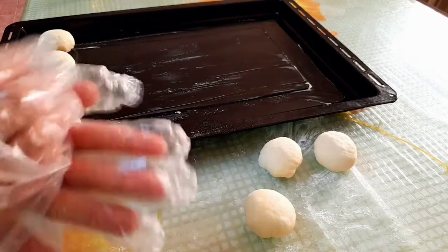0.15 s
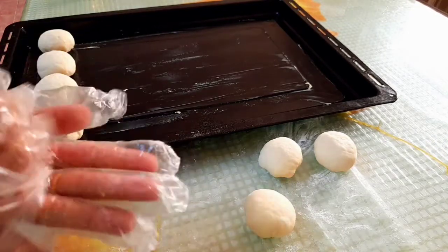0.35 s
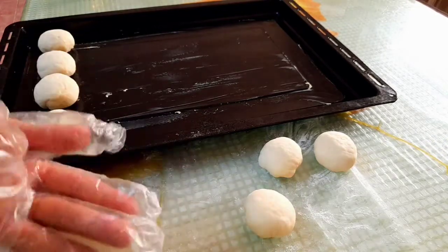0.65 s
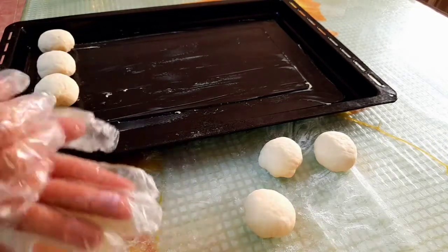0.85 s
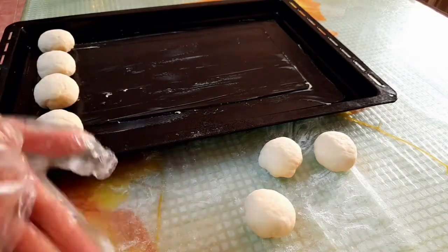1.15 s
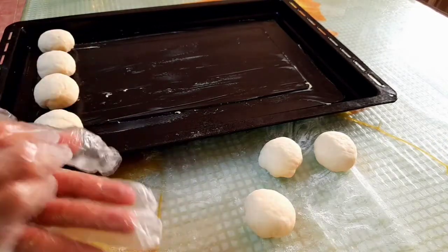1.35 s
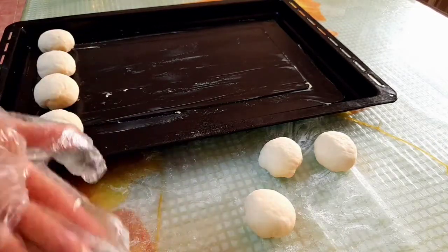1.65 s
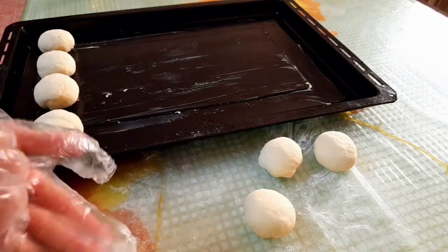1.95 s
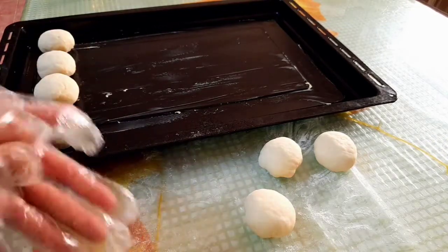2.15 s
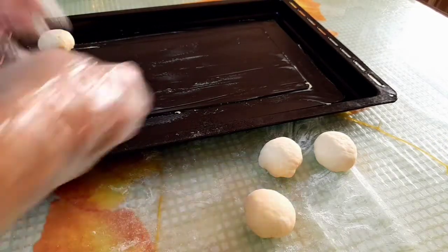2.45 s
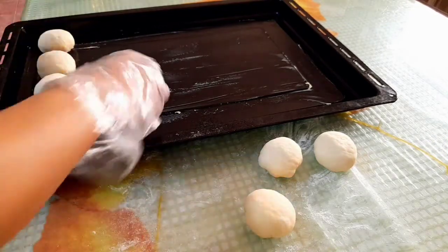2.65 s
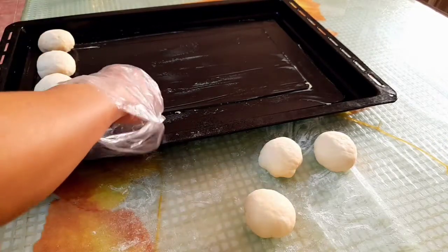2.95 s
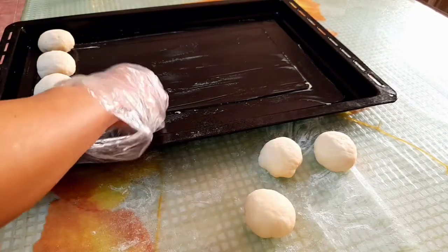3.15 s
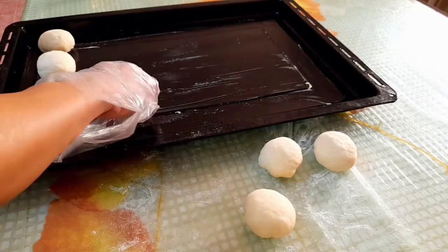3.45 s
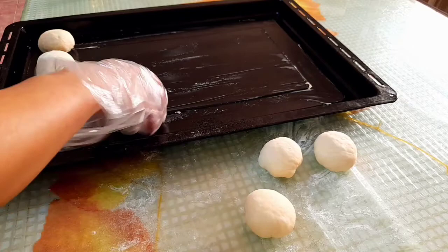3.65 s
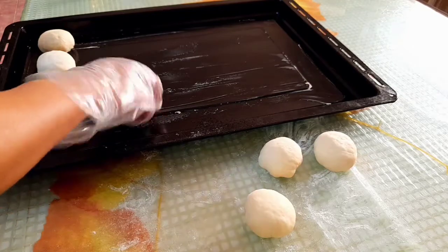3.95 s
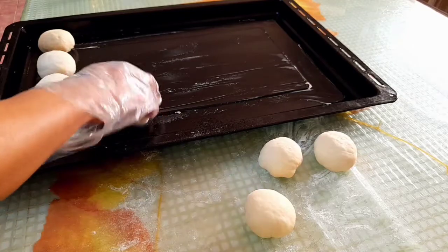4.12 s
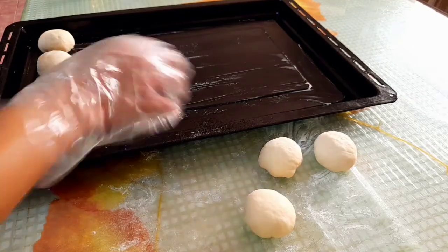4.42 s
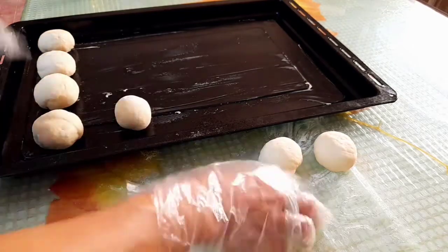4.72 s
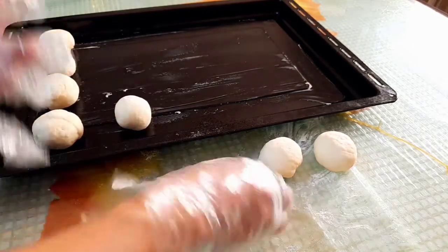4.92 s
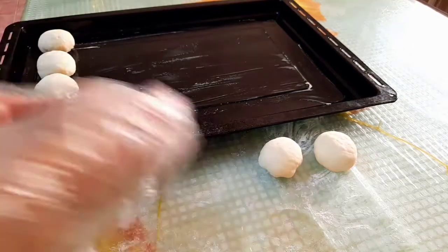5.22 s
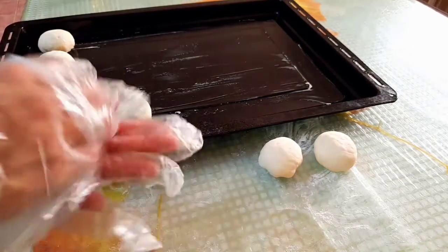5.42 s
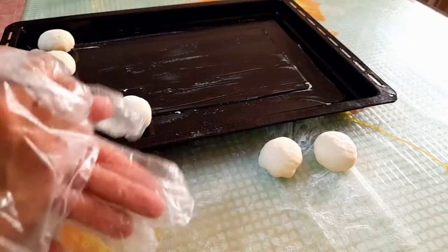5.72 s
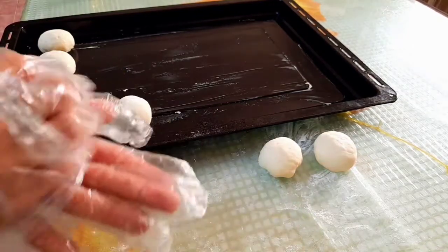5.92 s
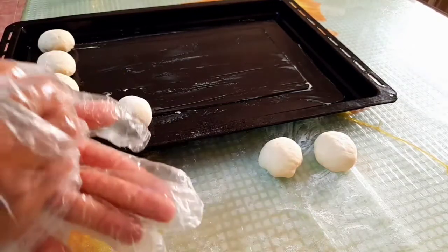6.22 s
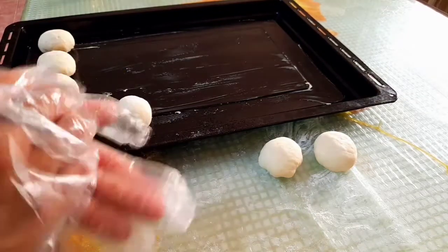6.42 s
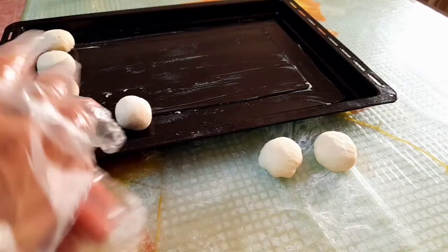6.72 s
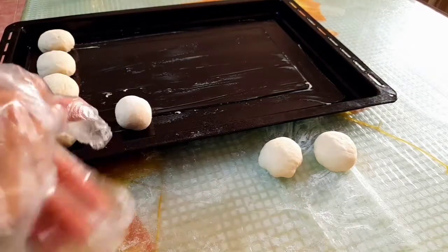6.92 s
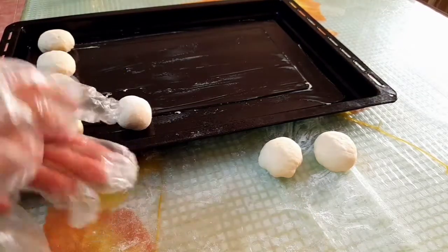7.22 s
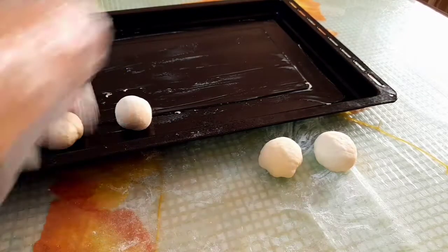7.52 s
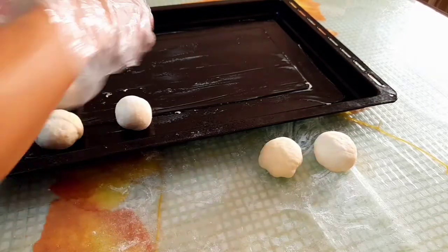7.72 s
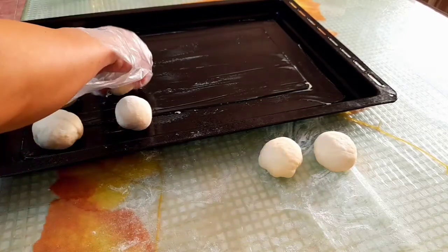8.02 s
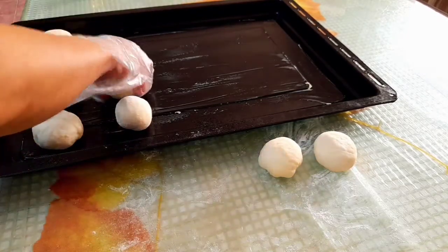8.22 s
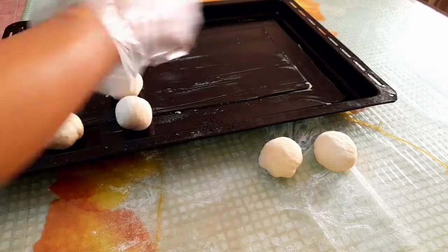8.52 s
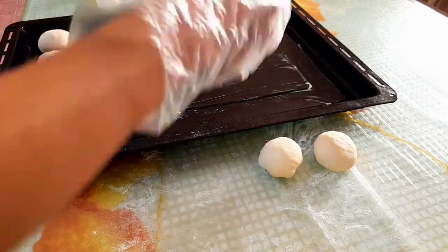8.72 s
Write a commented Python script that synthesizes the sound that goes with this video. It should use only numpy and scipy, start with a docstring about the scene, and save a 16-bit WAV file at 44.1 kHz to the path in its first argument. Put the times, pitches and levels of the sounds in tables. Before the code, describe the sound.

Close, bright crinkling of loose plastic film on moving hands, dense then sparse then dense again, above a constant deep hum in a small room.

```python
"""A kitchen: hands in loose, thin plastic gloves roll dough balls close to a stereo microphone.
The film rustles in swarms of tiny ringing snaps that swell and fade with each movement of the hands,
with sharper pops of filtered noise on top and short diffuse reflections around them.
Behind lie the hum of a compressor and the mains (sine harmonics), wavering fan tones,
and the air noise of the room (shaped noise)."""
import sys
import numpy as np
from scipy import signal
from scipy.fft import rfft, irfft, next_fast_len
from scipy.io import wavfile
from scipy.ndimage import uniform_filter1d

SR = 44100
rng = np.random.default_rng(int(sys.argv[2]) if len(sys.argv) > 2 else 0)


def wav_record(signal):
    """Record a signal, one row per channel, as 16-bit PCM in the file named by sys.argv[1]."""
    frames = np.transpose(np.atleast_2d(signal))
    bounded = np.clip(frames, -1, 1)
    # unit amplitude maps onto the largest positive 16-bit level
    quanta = np.round(bounded * 32767).astype(np.int16)
    wavfile.write(sys.argv[1], SR, quanta)


N = 391166   # length in samples


def amp(db):
    """dB to gain."""
    return 10 ** (np.asarray(db) / 20)


def rms_one(x):
    """Scale to unit rms."""
    return x / np.sqrt(np.mean(x ** 2) + 1e-20)


def at_hz(points, hz):
    """Read a curve of (f/Hz, value) on a log-frequency axis."""
    p = np.array(points)
    return np.interp(np.log(np.maximum(hz, 1)), np.log(np.maximum(p[:, 0], 1)), p[:, 1])


def sides(pan_db):
    """Left and right gains for a left-right level difference in dB."""
    return amp(np.multiply.outer([.5, -.5], pan_db))


def drift(rate_hz):
    """Slow random wander with rms 1: noise through two equal low-pass poles, run every 40 samples."""
    step, settle = 40, 4000
    pole = np.exp(-2 * np.pi * rate_hz * step / SR)
    noise = rng.standard_normal(N // step + settle + 2)
    slow = signal.lfilter([1], [1, -2 * pole, pole * pole], noise)[settle:]
    return np.interp(np.arange(N) / step, np.arange(len(slow)), rms_one(slow))


def colour(x, gain):
    """Multiply the spectrum by gain(Hz)."""
    size = next_fast_len(N + 4096)
    hz = np.arange(size // 2 + 1) * SR / size
    return irfft(rfft(x, size) * gain(hz), size)[..., :N]


COMPRESSOR_HZ, MAINS_HZ = 66.917, 59.98
# Harmonics of the compressor: (multiple of its f, rms level/dB, left-right level/dB)
COMPRESSOR_HARMONICS = [(1, -30, -4.0), (2, -63, -3.5), (3, -51, -1.5), (4, -60, -5.0), (5, -57, .8),
                        (6, -62, -2.0), (7, -68, 3.0), (8, -70, -9.0), (9, -71, .7), (11, -70, 7.0)]
# Harmonics of the mains: (multiple of its f, rms level/dB, left-right level/dB)
MAINS_HARMONICS = [(2, -56, -1.5), (4, -63, -10), (8, -72, -10), (10, -74.5, 5)]


def compressor_and_mains():
    """Two harmonic rows of sines at fixed pitch, their level breathing slightly together."""
    t, out = np.arange(N) / SR, np.zeros((2, N))
    load = amp(.35 * drift(.7))
    lead = np.array([[.1], [-.1]])   # radians: the left port is reached a little earlier
    for base_hz, rows in ((COMPRESSOR_HZ, COMPRESSOR_HARMONICS), (MAINS_HZ, MAINS_HARMONICS)):
        for multiple, level_db, pan_db in rows:
            phase = 2 * np.pi * (multiple * base_hz * t + rng.random())
            gain = np.sqrt(2) * amp(level_db) * sides(pan_db)[:, None]
            out += gain * load * np.sin(phase + lead)
    return out


# Tones of fans and motors: (mean f/Hz, typical rms level/dB, left-right level/dB, rms waver of f/Hz)
FAN_TONES = [(57.3, -53, -3.1, .3), (59.2, -57, -4.9, .2), (109.9, -43.5, -1.7, .35),
             (115.2, -55, -2.2, .4), (116.3, -51, -3.1, .4), (219.6, -59, -1.9, .7), (249.0, -58, -2.9, .7),
             (329.7, -59, -3.5, 1.0)]


def fans():
    """Single motor tones: the speed wavers, so each pitch wanders, and the level drifts as well."""
    out = np.zeros((2, N))
    for hz, level_db, pan_db, waver_hz in FAN_TONES:
        cycles = np.cumsum(hz + waver_hz * drift(0.411)) / SR
        phase = 2 * np.pi * (cycles + rng.random())
        level = np.sqrt(2) * amp(level_db + 1.07 * drift(2.3))
        out += level * sides(pan_db)[:, None] * np.sin(phase)
    return out


AIR_DB = -40   # rms level of the air noise
# Broad spectrum of the air noise: (f/Hz, relative level/dB per Hz)
AIR_SPECTRUM = [(20, -12), (45, -8), (80, -1.5), (130, -5), (190, -8.5), (350, -7.5), (510, -15),
                (750, -8.5), (1200, -12), (1700, -17), (2500, -16), (3300, -23), (7300, -27), (8500, -35),
                (12500, -27), (15000, -32)]
# Low resonances of the room: (f/Hz, width/Hz, lift/dB)
ROOM_RESONANCES = [(142.3, 7.6, 5.5), (164.2, 8.4, 12), (217, 8, 0), (245, 6, 3), (305, 21, 6),
                   (373, 13.5, 7), (414.3, 7.8, 7.5), (468, 10, 10.5), (554, 16, 7.5)]
# Stereo width of the air noise: (f/Hz, left-right correlation: 1 is mono, 0 is wide)
AIR_CORRELATION = [(60, 0.97), (130, 1), (290, 0.66), (640, 0.4), (1410, -0.11), (3100, -0.095),
                   (6820, -0.093), (15000, -0.054)]
# Stereo lean of the air noise: (f/Hz, left-right level/dB)
AIR_LEAN = [(60, -7.5), (110, -7), (200, 1), (380, -0.5), (700, 0.5), (1290, -1.5), (2380, -0.5),
            (4400, -0.5), (8120, -1.5), (15000, 4)]


def air():
    """Ventilation noise, lifted at the room's low modes; nearly mono in the bass, wide in the treble."""
    def shape(hz):
        lift = sum(db / (1 + ((hz - f) / (w / 2)) ** 2) for f, w, db in ROOM_RESONANCES)
        return amp(at_hz(AIR_SPECTRUM, hz) + lift)

    def alike(hz):
        return np.clip(at_hz(AIR_CORRELATION, hz), -.99, .99)

    white = rng.standard_normal((2, N))
    mid = colour(white[0], lambda hz: shape(hz) * np.sqrt(1 + alike(hz)))
    side = colour(white[1], lambda hz: shape(hz) * np.sqrt(1 - alike(hz)))
    both = colour(np.array([mid + side, mid - side]), lambda hz: sides(at_hz(AIR_LEAN, hz)))
    return amp(AIR_DB) * rms_one(both)


KITCHEN_T60_S, KITCHEN_DB = .2, -6   # decay time; reflections against the direct sound


def kitchen(x, count=12):
    """Diffuse reflections: dying noise tails, crossfaded in turn because the hands keep moving."""
    t = np.arange(SR // 2) / SR
    turn = np.arange(N) / SR * 7.0   # seven new tails a second
    out = 0
    for k in range(count):
        tail = rng.standard_normal((2, len(t))) * amp(-60 * t / KITCHEN_T60_S)
        tail = tail * (t > .004)   # the first reflections come after 4 ms
        tail = tail / np.sqrt(np.sum(tail ** 2, axis=1, keepdims=True))
        window = np.sqrt(np.clip(1 - np.abs((turn - k) % count - 1), 0, 1))
        out = out + signal.fftconvolve(x * window, tail, axes=1)[:, :N]
    return out


# Path of the hands across the stereo image: (t/s, delay of the right port/samples)
HAND_PATH = [(0, 14), (2.3, 14), (2.6, 7), (4.4, 8), (4.7, 1), (5.1, 12), (5.5, 14), (7.6, 14), (8.0, 8),
             (8.87, 5)]


def port_lag():
    """Samples by which the right microphone port hears the hands later than the left."""
    return np.interp(np.arange(N) / SR, *np.transpose(HAND_PATH))


# Tone of the plastic film at the microphone: (f/Hz, relative level/dB per Hz)
FILM_SPECTRUM = [(350, -24), (600, -9), (746, -5), (820, -25), (952, -5.5), (1180, -12.5), (1270, -5.5),
                 (1680, -6), (2430, -4), (4790, -2), (6200, -1), (7500, -1), (8360, -6), (12700, 0.5),
                 (15400, -7)]


def film_gain(hz):
    """Colour of the thin film, bright because its folds are small."""
    return amp(at_hz(FILM_SPECTRUM, hz))


POP_SWELL_S, POP_FADE_S = .0012, .002   # time constants
POP_LOW_DB, POP_PAN_SPREAD_DB = -4, 1.5   # trim below 5 kHz; left-right scatter
STRAY_PER_S, STRAY_DB, STRAY_SPREAD_DB = 25.0, 7.0, 1   # impulse level against the rustle of the moment
# The clearest single folds that pop out of the rustle: (t/s, impulse level/dB ahead of the envelope)
CLEAR_POPS = [(0.0917, -32), (0.1473, -20), (0.395, -26), (0.4424, -25), (0.615, -26), (0.7527, -38),
              (0.829, -23.5), (0.8634, -34), (1.1283, -24), (1.3438, -27), (1.5344, -32), (1.6198, -29),
              (2.6095, -34), (2.6504, -30), (2.7651, -37.5), (2.8838, -35), (2.9173, -28), (2.9836, -34),
              (3.2021, -39), (3.2241, -41), (3.495, -38), (3.6162, -34), (3.708, -38), (3.7524, -38),
              (4.0841, -28), (4.2288, -34), (4.2887, -32), (4.3545, -33), (4.4782, -33), (4.5476, -37),
              (4.6294, -33), (5.0833, -34), (5.3627, -24), (5.5194, -24), (5.6058, -22), (5.8446, -29),
              (5.9549, -25), (6.0686, -26), (6.3255, -29), (7.1751, -33), (7.5921, -29), (7.8765, -33),
              (8.1853, -33), (8.314, -39), (8.3439, -33), (8.59, -30.5), (8.6378, -35)]


def pops(level_db, pan_db):
    """Single folds: flurries of film noise, lows trimmed, that build up and die within milliseconds."""
    stray = rng.random(N) < STRAY_PER_S / SR
    strength = stray * amp(level_db + STRAY_DB + STRAY_SPREAD_DB * rng.standard_normal(N))
    for s, pop_db in CLEAR_POPS:
        strength[round(s * SR)] = amp(pop_db)
    envelope = strength * sides(pan_db + POP_PAN_SPREAD_DB * rng.standard_normal(N))
    swell, fade = np.exp(-1 / (POP_SWELL_S * SR)), np.exp(-1 / (POP_FADE_S * SR))
    envelope = signal.lfilter([1], [1, -fade], envelope + 1e-18)
    envelope = signal.lfilter([1 - swell], [1, -swell], envelope)
    film = rms_one(colour(rng.standard_normal((2, N)), film_gain))
    low = colour(film, lambda hz: 1 / (1 + (hz / 5000) ** 6))
    return envelope * (film - low + amp(POP_LOW_DB) * low)


RESTING_DB = -62   # the film creeps even while the hands are still
# Each squeeze or turn of the hands:
# (peak t/s, rustle level/dB, time to rise 10 dB/ms, time to fall 10 dB/ms, large folds against fine/dB)
HAND_MOVES = [(0.004, -34.5, 53, 43, 3), (0.147, -30.0, 65, 131, 0), (0.233, -27.0, 89, 85, 1.5),
              (0.448, -28.0, 78, 55, 0.5), (0.577, -28.0, 84, 112, 0), (0.756, -38.5, 26, 44, 7),
              (0.858, -30.5, 86, 115, 0), (0.989, -39.5, 36, 270, 1), (1.128, -28.5, 41, 167, 0),
              (1.195, -31.0, 67, 49, -0.5), (1.265, -32.0, 32, 135, 2), (1.364, -32.0, 50, 117, 0),
              (1.535, -33.0, 63, 50, -2), (1.675, -32.5, 289, 49, 2), (1.726, -34.0, 327, 40, 1.0),
              (1.929, -33.0, 167, 61, 1.5), (2.059, -36.0, 33, 232, 2), (2.17, -32.5, 94, 126, 2),
              (2.321, -31.5, 196, 64, 1.5), (2.446, -48.0, 24, 198, 4), (2.659, -45.5, 179, 10, -8),
              (2.775, -50.5, 217, 19, -2.5), (2.929, -39.0, 41, 151, -2), (3.113, -45.5, 31, 149, 1.0),
              (3.218, -41.5, 102, 118, -3), (3.509, -44.5, 128, 22, 1.0), (3.624, -42.0, 90, 24, -3),
              (3.668, -45.0, 19, 218, -7), (3.778, -39.5, 28, 219, 2), (4.097, -40.5, 172, 43, -0.5),
              (4.24, -47.0, 73, 26, -0.5), (4.307, -37.5, 38, 80, -3), (4.461, -41.0, 38, 155, -3),
              (4.547, -44.0, 6, 52, -2), (4.637, -49.5, 13, 381, -3), (4.72, -31.0, 6, 64, 5.5),
              (4.773, -31.5, 12, 174, -4), (4.978, -38.0, 204, 110, 2), (5.09, -43.5, 55, 341, 1.5),
              (5.376, -30.5, 17, 75, 2), (5.514, -32.5, 114, 119, -1), (5.621, -26.0, 37, 99, -3),
              (5.759, -32.0, 125, 54, 1), (5.847, -38.5, 23, 149, 2), (5.966, -33.0, 135, 34, 0),
              (6.108, -32.0, 282, 82, 1), (6.322, -30.5, 47, 76, 1.0), (6.409, -31.5, 54, 164, -3),
              (6.555, -41.5, 18, 234, -4), (6.614, -33.0, 36, 221, 2), (6.787, -34.5, 46, 36, 5),
              (6.878, -29.5, 95, 44, -1.5), (7.002, -37.0, 258, 45, 2), (7.088, -35.0, 126, 55, 2.5),
              (7.183, -34.0, 109, 61, 1.5), (7.336, -33.5, 142, 114, 2.5), (7.552, -35.5, 361, 59, 3),
              (7.771, -48.5, 115, 40, 0), (7.873, -48.0, 66, 138, -2), (8.038, -47.0, 85, 124, -0.5),
              (8.193, -41.5, 33, 78, 3), (8.358, -41.0, 34, 58, 0.0), (8.654, -40.0, 85, 207, -3),
              (8.82, -40.0, 85, 322, 3)]


def moves():
    """Swells of all moves add in power; the louder a move, the more it sets the balance of fold sizes."""
    t = np.arange(0, N + 40, 40) / SR
    power, large = amp(2 * RESTING_DB), 0
    for s, level_db, rise_ms, fall_ms, large_db in HAND_MOVES:
        ms_per_10_db = np.where(t < s, max(rise_ms, 1), max(fall_ms, 1))
        away = 1000 * np.abs(t - s) / ms_per_10_db
        swell = amp(2 * (level_db - 10 * away))
        power = power + swell
        large = large + swell * large_db
    curves = (10 * np.log10(power), large / power)
    return [np.interp(np.arange(N) / SR, t, c) for c in curves]


def snaps(per_s, spread_db, large_db):
    """Buckling folds: random clicks, each ringing a few cycles at a pitch set by the fold's size."""
    born = np.flatnonzero(rng.random(N) < per_s / SR)
    size = amp(spread_db * np.minimum(rng.exponential(1, len(born)), 4.0))
    aim = rng.standard_normal((3, len(born)))   # strength and sign: shared, left, right
    pitches_hz, dealt = np.geomspace(600, 15000, 15), rng.integers(0, 15, len(born))
    out = np.zeros((2, N))
    for k, hz in enumerate(pitches_hz):
        large, pick = 1 - k / 14, dealt == k   # large: 1 for the lowest pitch, 0 for the highest
        # large folds radiate evenly; small ones give each port its own share and sign of a snap
        share = np.clip(0.018 + 1.19 * large ** 2, 0, 1)
        strength = size[pick] * (np.sqrt(share) * aim[0, pick] + np.sqrt(1 - share) * aim[1:, pick])
        # folds of one size come in spells, so the colour shifts from crinkle to crinkle
        patch_db = 0.59 * drift(6.1)
        clicks = np.full((2, N), 1e-18)
        clicks[:, born[pick]] = strength * amp(large_db[born[pick]] * large + patch_db[born[pick]])
        r, w = np.exp(-np.pi * hz / 3.5 / SR), 2 * np.pi * hz / SR   # resonance with Q of 3.5
        ring_in = np.array([1, 0, -1]) * (1 - r * r) / 2
        out += signal.lfilter(ring_in, [1, -2 * r * np.cos(w), r * r], clicks)
    return out


def flatten(x):
    """Gain by frequency that takes out a sound's own average colour and puts in that of the film."""
    hz, power = signal.welch(x, SR, nperseg=256)
    own = np.sqrt(power.mean(axis=0))
    return lambda f: film_gain(f) / np.interp(f, hz, own + 1e-12)


def gloves(level_db, large_db, pan_db):
    """Stronger movement buckles the film more often and louder; the snaps come in clumps."""
    per_s = 12000 * amp(.5 * (level_db + 31) + 2.5 * drift(25))
    swarm = snaps(per_s, spread_db=-2.0, large_db=large_db)
    swarm = swarm / np.sqrt(uniform_filter1d(per_s, size=4000))   # even out, so level_db sets the swell
    return rms_one(colour(swarm, flatten(swarm))) * amp(level_db) * sides(pan_db)


PAN_DB_PER_SAMPLE, CENTRE_LAG = 0.41, 10   # later on the right leans left; even at a lag of 10 samples


def scene():
    """Gloves near the microphone, with the room; hum, fans and air behind."""
    lag = port_lag()
    level_db, large_db = moves()
    pan_db = PAN_DB_PER_SAMPLE * (lag - CENTRE_LAG)
    near = gloves(level_db, large_db, pan_db) + pops(level_db, pan_db)
    heard = np.arange(N) - np.round(lag).astype(int)
    near[1] = near[1][np.maximum(heard, 0)]
    behind = compressor_and_mains() + fans() + air()
    return near + amp(KITCHEN_DB) * kitchen(near) + behind


CUTOFF_HZ = 15470


def record(dry):
    """A mild noise suppressor turns all down by up to 1.2 dB in quiet treble; the top is cut steeply."""
    treble = signal.sosfilt(signal.butter(2, 3000, "high", fs=SR, output="sos"), dry)
    slow = np.exp(-1 / (.3 * SR))   # 0.3 s smoothing
    power = signal.lfilter([1 - slow], [1, -slow], np.mean(treble ** 2, axis=0), zi=[3e-4])[0]
    level_db = 10 * np.log10(power)
    gain = amp(-1.2 * np.clip((-30 - level_db) / 8, 0, 1))
    top_cut = signal.ellip(12, .3, 70, CUTOFF_HZ, fs=SR, output="sos")
    return signal.sosfilt(top_cut, dry * gain)


dry = scene()
out = record(dry)
wav_record(out)
```